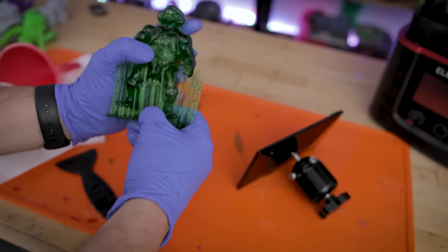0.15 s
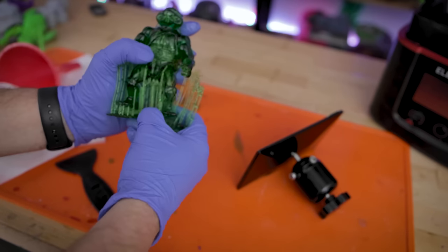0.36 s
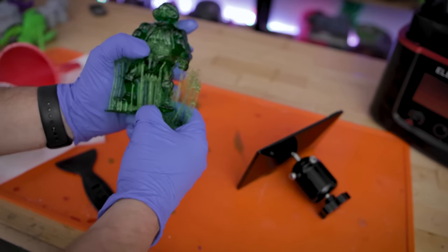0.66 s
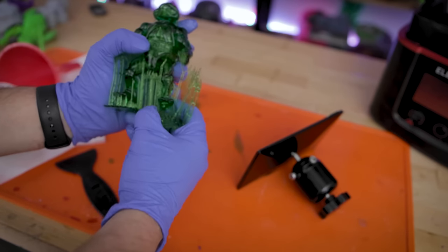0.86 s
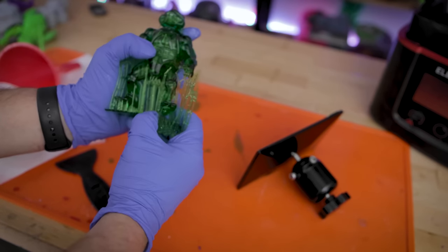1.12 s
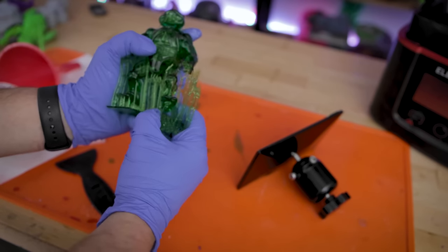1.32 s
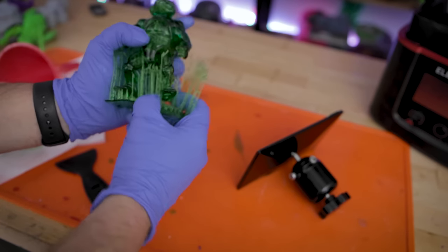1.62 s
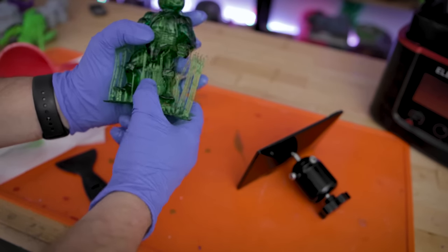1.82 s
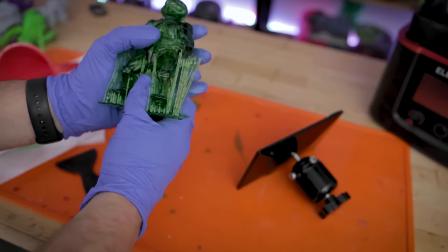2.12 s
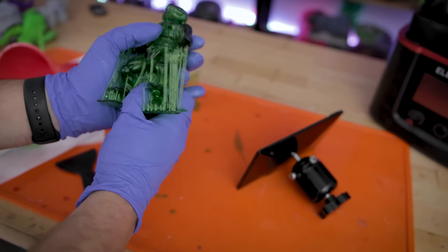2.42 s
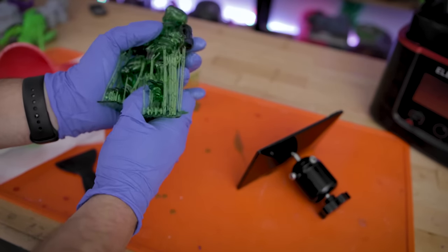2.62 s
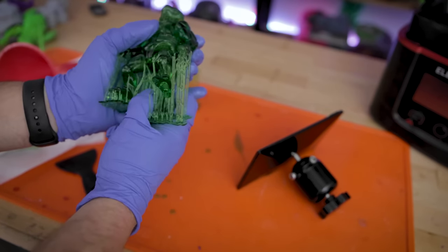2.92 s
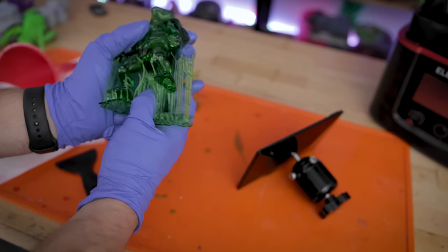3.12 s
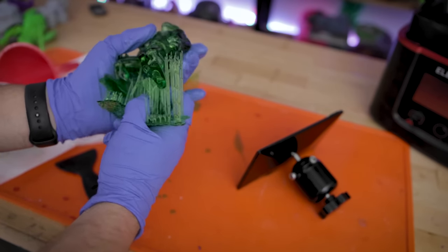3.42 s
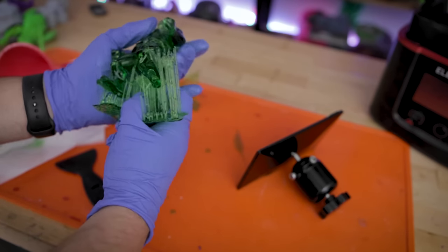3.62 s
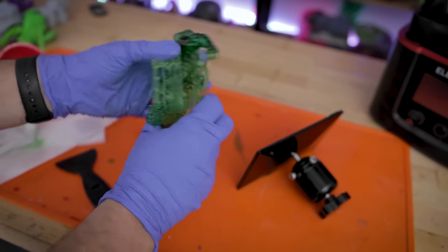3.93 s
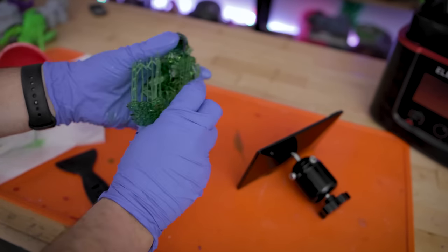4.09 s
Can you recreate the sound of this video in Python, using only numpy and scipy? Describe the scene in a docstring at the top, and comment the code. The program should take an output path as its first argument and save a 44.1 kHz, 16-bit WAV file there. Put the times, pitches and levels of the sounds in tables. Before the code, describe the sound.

Brittle plastic supports snap and crackle in quick irregular bursts close up, with a few low jolts, then fall nearly silent over faint hum.

```python
"""Thin supports snap off a resin-printed figure in gloved hands, close to a microphone over a workbench.
Each brittle strut is a burst of fracture noise with a ringing stump, and its blow excites the figure's modes.
Five times a whole bundle splinters in a quick run of snaps and gives way with a low, decaying jolt.
Gloves rub and tick as shaped noise over mains hum, a fan and a rush of air.
A small room answers with decaying noise, and the input clips whatever exceeds full scale."""
import sys
import numpy as np
from scipy import signal
from scipy.fft import rfft, irfft
from scipy.io import wavfile

SR = 44100
rng = np.random.default_rng(int(sys.argv[2]) if len(sys.argv) > 2 else 0)


def store_wav(level_fs):
    """Save 16-bit WAV to argv[1]."""
    pcm = np.round(np.clip(np.atleast_2d(level_fs), -1, 1) * 32767)
    wavfile.write(sys.argv[1], SR, pcm.T.astype(np.int16))


N = 187767
TIME = np.arange(N) / SR


def undb(db):
    """Logarithmic level: decibels to amplitude gain."""
    return 10 ** (np.asarray(db) / 20)


def unit(x):
    """Energy normalisation: the squares sum to one."""
    return x / np.sqrt(np.sum(x ** 2))


def level(x, db):
    """Root-mean-square level: scale to a given dB rms."""
    return x * undb(db) / np.std(x)


def fade(t, t60):
    """Exponential decay: a fall of 60 dB in t60 seconds."""
    return np.exp(-np.log(1000) * t / t60)


def add(out, s, x):
    """Superposition: mix x in from time s."""
    i = max(int(s * SR), 0)
    out[i:i + len(x)] += x[:max(N - i, 0)]


def colour(x, points, size=512):
    """Minimum-phase filtering through (f/Hz, level/dB) points, keeping the energy of white noise."""
    hz, db = np.transpose(points)
    grid = np.maximum(np.fft.rfftfreq(size, 1 / SR), 1)
    log_gain = np.log(undb(np.interp(np.log(grid), np.log(hz), db)))
    # folding the cepstrum onto positive times makes the response causal
    cepstrum = irfft(log_gain)
    cepstrum[1:size // 2] *= 2
    cepstrum[size // 2 + 1:] = 0
    response = unit(irfft(np.exp(rfft(cepstrum))))
    return signal.fftconvolve(x, response)[:len(x)]


# mains hum and the fan's shaft: (f/Hz, level/dB rms)
HUM_LINES = [(52.4, -52), (60, -48), (120, -47.5), (180, -63), (240, -58)]
# spectrum of the steady workshop air: (f/Hz, relative level/dB per Hz)
AIR_SPECTRUM = [(20, -6), (45, -2), (80, 8), (110, -16.5), (152, 2.5), (200, -10), (300, -11.5),
                (500, -16.5), (1500, -26), (2800, -39), (4000, -19.5), (5500, -47), (10000, -57),
                (16000, -34)]


def workshop(air_db=-49):
    """Superposed steady tones: mains hum beats against the fan, over a broadband rush of air."""
    hum = np.zeros(N)
    for hz, db in HUM_LINES:
        phase = 2 * np.pi * (hz * TIME + rng.random())
        hum += np.sqrt(2) * undb(db) * np.sin(phase)
    air = colour(rng.standard_normal(N), AIR_SPECTRUM, size=8192)
    return hum + level(air, air_db)


# spectrum of what the room returns: (f/Hz, relative level/dB)
ROOM_SPECTRUM = [(100, 4.5), (500, -1), (1500, 5.5), (2700, 1.5), (4000, 3), (7000, 0), (10000, -7.5),
                 (16000, -7.5)]


def room(x, low_t60=0.16, mid_t60=0.23, high_t60=0.19, wet_db=-13, early_db=0.0, wall_s=0.0115,
         wall_db=-3, wall_t60=0.054, sparse_db=4.0, sparse_s=0.044, size=20000):
    """Reverberation: the bench scatters at once, the walls answer later, and the mid band decays slowest."""
    t, noise = TIME[:size], rng.standard_normal(size)
    # the first echoes come singly: their uneven levels even out along the tail
    unevenness = np.minimum(rng.exponential(size=size), 3) - 1.5
    noise = noise * undb(sparse_db * np.exp(-t / sparse_s) * unevenness)
    low_pass = [signal.butter(2, hz, fs=SR, output="sos") for hz in (1500, 7000)]
    low, under = (signal.sosfiltfilt(sos, noise) for sos in low_pass)
    tail = low * fade(t, low_t60)
    tail += (under - low) * fade(t, mid_t60)
    tail += (noise - under) * fade(t, high_t60)
    walls = 1 + undb(wall_db) * fade(np.abs(t - wall_s), wall_t60)
    build = np.where(t < wall_s, undb(early_db), walls)
    response = colour(unit(tail * build), ROOM_SPECTRUM)
    return undb(wet_db) * signal.fftconvolve(x, response)[:N]


GRIP_DB = -57.5  # gloves merely holding the print, dB
# the gloves slide to a new hold: (middle t/s, half-length t/s, level/dB)
GLOVE_SLIDES = [(1.769, 0.014, -36.5), (2.03, 0.27, -56), (3.816, 0.15, -50.5), (4.244, 0.076, -59.5)]


def grip():
    """Amplitude modulation: a steady hold, and a bell-shaped swell for every slide."""
    amount = np.full(N, undb(GRIP_DB))
    for s, half_s, db in GLOVE_SLIDES:
        amount += undb(db) * np.exp(-((TIME - s) / half_s) ** 2)
    return amount


# spectrum of the rubbing gloves: (f/Hz, relative level/dB)
GLOVE_SPECTRUM = [(200, 0), (1000, -3), (4000, 1.5), (8000, -3.5), (12000, -5), (16000, -12.5)]


def gloves(tick_rate=200, spread_db=4.0, tick_db=-2, rub_db=-5):
    """Stick-slip friction: rubber slides with a soft hiss and catches on splinters in tiny random ticks."""
    chance, size = rng.random(N), np.minimum(rng.exponential(size=N), 3)
    catches = (chance < tick_rate / SR) * undb(spread_db * size)  # tick_rate per second on average
    tick_envelope = signal.fftconvolve(catches, fade(TIME[:256], 0.0087))[:N]
    ticks = tick_envelope * rng.standard_normal(N)
    rub = level(ticks, tick_db) + level(rng.standard_normal(N), rub_db)
    return level(colour(rub, GLOVE_SPECTRUM), 0) * grip()


# a whole bundle gives way and jolts the hands:
# (t/s, splintering beforehand t/s, splinter level/dB on the scale of the struts, jolt level/dB, jolt f/Hz)
BUNDLE_BREAKS = [(.702, .031, -21, -45, 118), (1.523, .008, -2.5, -21, 90.5),
                 (2.492, 0.023, -5.5, -37, 106), (2.839, 0.014, -10, -18.5, 140),
                 (3.199, .055, -19.5, -30, 168)]


def jolts(t60=0.031, flesh_db=-5, size=8192):
    """Release of load: a damped low tone and dull noise as the weight drops off the fingers."""
    out, t = np.zeros(N), TIME[:size]
    for s, _, _, db, hz in BUNDLE_BREAKS:
        dull = colour(rng.standard_normal(size), [(60, 9), (150, -11.0), (400, -16.5), (2000, -34)])
        thud = np.sin(2 * np.pi * hz * t) + level(dull, flesh_db)
        add(out, s, undb(db) * thud * fade(t, t60))
    return out


def raft(blows, hz=835, t60=0.042, ring_db=-25, size=8192):
    """Damped resonance: the base plate answers blows only while braced, before the first bundle goes."""
    t, braced = TIME[:size], TIME < BUNDLE_BREAKS[0][0]
    ring = unit(np.sin(2 * np.pi * hz * t) * fade(t, t60))
    return undb(ring_db) * signal.fftconvolve(blows * braced, ring)[:N]


# the figure's own modes: (f/Hz, relative level/dB, decay time t60/s)
FIGURE_MODES = [(2947, -13, 0.07), (3280, -18, 0.059), (3830, -20, 0.12), (3650, 27, 0.057),
                (4210, -8, 0.3), (5260, -26, 0.094), (6150, -15, 0.067), (7260, -25, 0.08)]


def figure(blows, ring_db=-21, size=8192):
    """Modal excitation: every blow sets the hand-damped print ringing faintly in its modes."""
    t, ring = TIME[:size], np.zeros(size)
    for hz, db, t60 in FIGURE_MODES:
        ring += undb(db) * np.sin(2 * np.pi * hz * t) * fade(t, t60)
    return undb(ring_db) * signal.fftconvolve(blows, unit(ring))[:N]


def splinters(gap_s=0.01, unevenness=0.14, overrun_s=0.007, scatter_db=0.5, ring_hz=4600,
              ring_octaves=0.25, treble_db=5, count=16):
    """Load transfer: each broken strut burdens the next, in a quick uneven run; rows like STRUT_SNAPS."""
    rows = []
    for s, lead_s, db, _, _ in BUNDLE_BREAKS:
        for k, (late, loud, high) in enumerate(rng.standard_normal((count, 3))):
            due = s - lead_s + k * gap_s
            if due < s + overrun_s:
                start = due + unevenness * gap_s * late
                hz = ring_hz * 2 ** (ring_octaves * high)
                rows.append((start, db + scatter_db * loud, hz, treble_db))
    return rows


def crack(points, t60, size=512):
    """Brittle fracture: a burst of coloured noise that dies within milliseconds."""
    return unit(colour(rng.standard_normal(size) * fade(TIME[:size], t60), points))


# struts breaking: (t/s, relative strength level/dB, stump ring f/Hz, treble level/dB relative to strength)
STRUT_SNAPS = [(0.0513, -2.5, 4510, 6), (0.07, -6.5, 3880, 0.5), (.1834, -2, 4000, 0.5),
               (0.2565, -7.5, 4160, 2), (0.2613, -4, 4400, 3.5), (0.2958, -10.5, 3580, 5.5),
               (0.3238, 0, 5650, 4), (.356, -12.5, 4240, -3), (0.4646, -2, 3700, -1.5),
               (.4911, -10.5, 4220, -2.5), (.594, -18.5, 5260, 13.5), (.6677, -15, 4200, 12),
               (0.6703, -5, 4270, 11.5), (.678, -4, 3720, 5), (0.6873, -4, 4900, -5),
               (0.6979, 0.5, 3640, 1), (.7, 5, 3440, -1), (0.7094, -4.5, 4530, 0.5), (.79, -9, 4360, 5.5),
               (.807, -8.5, 3520, 8.5), (.8165, -17, 3570, 10.5), (1.0557, -9, 4020, 5),
               (1.2055, -12.5, 4300, -2.5), (1.2817, -8.5, 3750, 1), (1.2897, -17.5, 3620, 10),
               (1.4837, -7.5, 6200, 8), (1.4876, 2, 3710, -3.5), (1.5077, -1, 6600, 6.5),
               (1.5215, 1.5, 3580, 4), (1.5341, -6, 4230, 0.5), (1.8145, -32, 6160, 13),
               (1.917, -32.5, 2750, -11), (1.9739, -25.5, 4330, 5.5), (2.0783, -23, 4230, 1),
               (2.195, -14, 3220, -5), (2.217, -11, 4140, 1.5), (2.3507, -4, 4400, -5),
               (2.4022, -14, 3800, -9), (2.4253, -5, 4450, 3), (2.467, -15, 4100, 14), (2.482, 1, 6570, -8),
               (2.4921, 4.5, 3640, 2), (2.522, -21.5, 4200, 11), (2.5863, -3, 3780, -1),
               (2.6397, -6, 3400, 5), (2.6495, -5.5, 6250, 9.5), (2.7128, -10, 3820, 8.5),
               (2.78, -15, 4460, 1), (2.791, 0.5, 6620, -1), (2.8397, 6.5, 3360, 5),
               (2.8531, -8.5, 4540, 9.5), (2.885, -19, 6500, 9), (2.922, -4.5, 3400, 2),
               (2.9373, -1.5, 3190, -15), (2.9682, -16, 3930, 11), (2.974, -15, 3830, 13),
               (3.0181, -15.5, 5000, 8), (3.0439, -12, 6300, 15), (3.0617, -8.5, 5000, 4),
               (3.0811, -11, 6400, 5), (3.1299, -7, 4100, 3), (3.1364, -6.5, 4320, 7.5),
               (3.1551, -6, 4240, -1), (3.1754, -16, 4720, 11.5), (3.198, 2.5, 4220, 8.5),
               (3.216, -7.5, 6350, -1), (3.2411, -11, 4000, -8), (3.256, -10.5, 4220, 8.5),
               (3.3077, -7, 3900, 5), (3.3157, -9, 4340, 5), (3.3294, -5, 4570, 7), (3.3514, -22, 6340, 17),
               (3.3685, -5, 4300, 8), (3.379, 3.5, 6170, -2.5), (3.418, -2.5, 4000, 4.5),
               (3.42, -0.5, 3810, 4), (3.4761, -9, 4300, -34), (3.4833, -3.5, 5820, 3.5),
               (3.516, -5.5, 3580, -13), (3.5211, -.5, 3960, 4.5), (3.649, -17, 3880, 5),
               (3.6785, -19.5, 2900, 0), (3.7988, -31.5, 4070, 7), (3.9229, -28, 6900, -0.5),
               (3.9852, -43, 3930, -16), (4.054, -31, 1850, -16), (4.1076, -39, 6100, 12)]
# spectra of the three parts of a crack: (f/Hz, relative level/dB)
BASS_SPECTRUM = [(100, -20.5), (350, -22.5), (700, -4.5), (1100, -2), (1600, -1), (2200, 3.5), (3500, -8)]
BODY_SPECTRUM = [(1200, -49), (2200, -14), (3400, -2), (4600, -1.5), (6200, -3.5), (8000, -14.5)]
TREBLE_SPECTRUM = [(4500, -31), (6800, -1), (9500, 1), (12500, -2.5), (16000, -10)]
# bass of a snap with strength and treble at 0 dB, before the common gain: (t/s, level/dB)
BASS_COURSE = [(0.05, -10), (.19, -15.5), (.55, -13.5), (.68, -9), (1.05, -21), (1.22, -8), (1.52, -8),
               (2.08, -10.5), (2.2, -31.5), (2.45, -7), (2.93, -5.5), (3.06, -21), (3.2, -10.5),
               (3.41, -10), (3.5, -8.5)]
BASS_GROWTH = 0.71  # dB of bass per dB of strength: big snaps sound a little thinner
BASS_THINNING = 0.22  # dB of bass lost per dB of treble: a thin, bright strut barely moves the print


def snaps(ring_cycles=42, ring_db=-4, body_db=-1, bright_db=-1.5, gain_db=15.0, lengthen=0.087, size=512):
    """Impulsive radiation: struts crack and stumps ring; gives direct sound and body, treble, bass blows."""
    direct, blows, t = np.zeros(N), np.zeros((3, N)), TIME[:size]
    for s, db, hz, treble_db in STRUT_SNAPS + splinters():
        duration = undb(lengthen * db)  # a stronger strut takes longer to break through
        stump = unit(np.sin(2 * np.pi * hz * t) * fade(t, ring_cycles / hz))
        body_crack = crack(BODY_SPECTRUM, t60=0.011 * duration)
        body = unit(undb(ring_db) * stump + undb(body_db) * body_crack)
        treble = crack(TREBLE_SPECTRUM, t60=0.0045 * duration)
        bass = crack(BASS_SPECTRUM, t60=0.0062)
        bass_db = np.interp(s, *np.transpose(BASS_COURSE))
        bass_db += BASS_GROWTH * db - BASS_THINNING * treble_db
        sizes = undb(gain_db + np.array([db, db + treble_db + bright_db, bass_db]))
        add(direct, s, sizes @ np.array([body, treble, bass]))
        blows[:, int(s * SR)] += sizes
    return direct, blows


# what reaches the walls, dB: the crack as the microphone hears it, and its even spread in other directions
OWN_DB, EVEN_DB = -2.5, -0.67


def scene():
    """Superposition: snaps, resonances, thuds and gloves, with their reverberation, over the workshop."""
    direct, blows = snaps()
    body, treble, bass = blows
    handling = figure(body) + raft(body) + jolts() + gloves()
    even = colour(body, BODY_SPECTRUM) + colour(treble, TREBLE_SPECTRUM)
    scattered = room(undb(OWN_DB) * direct + handling)
    scattered += room(undb(EVEN_DB) * even)
    scattered += room(colour(bass, BASS_SPECTRUM))
    return (direct + handling + scattered + workshop())[None]


TOP_HZ = 16000  # upper limit of the recorded band


def record(dry):
    """Overload and band limiting: the input clips at full scale, then a steep low-pass cuts the top."""
    clipped = np.clip(dry, -1, 1)
    low_pass = signal.ellip(8, 0.2, 70, TOP_HZ, fs=SR, output="sos")  # 0.2 dB ripple, 70 dB rejection
    return signal.sosfilt(low_pass, clipped)


dry = scene()
out = record(dry)
store_wav(out)
```